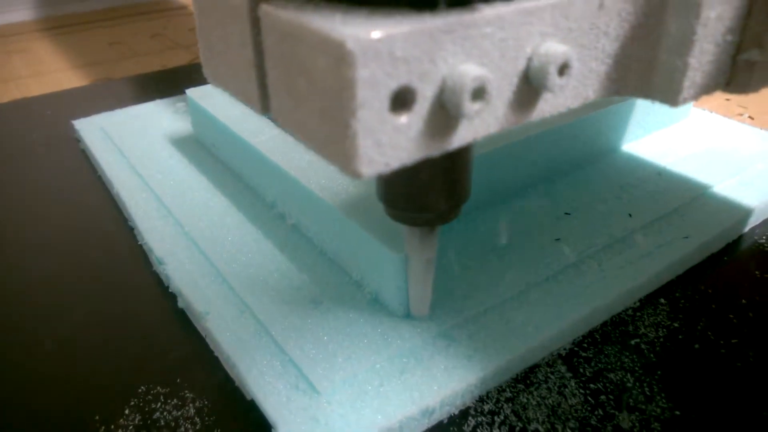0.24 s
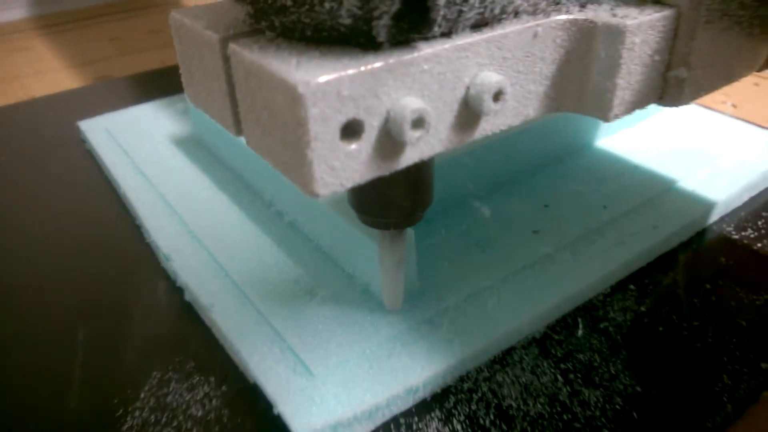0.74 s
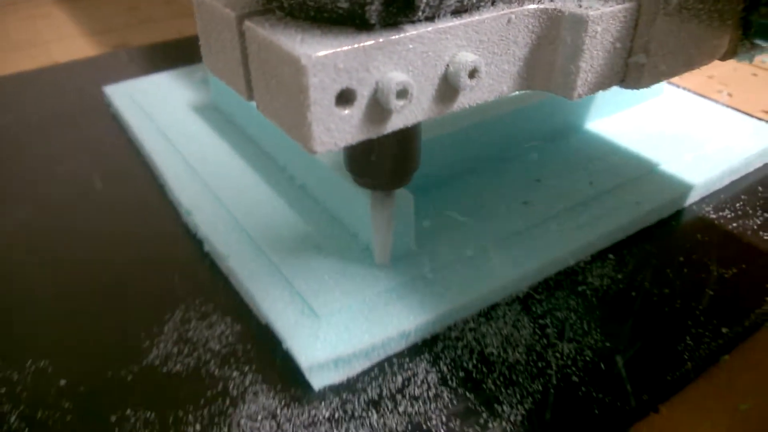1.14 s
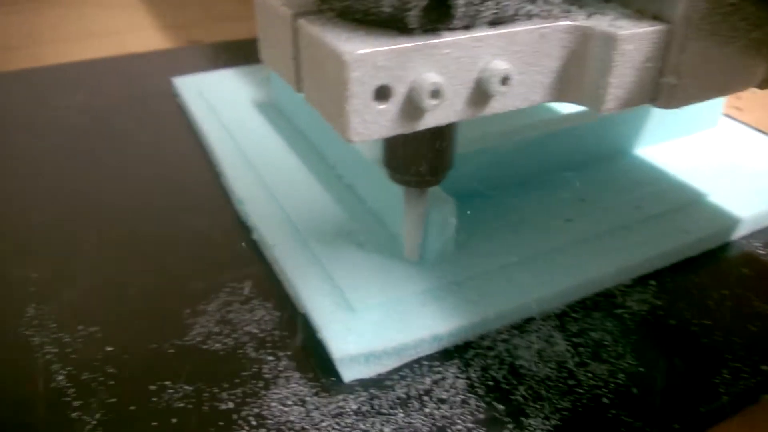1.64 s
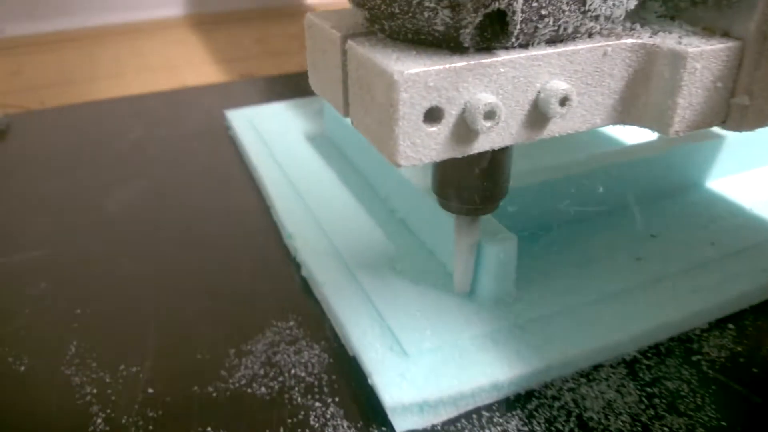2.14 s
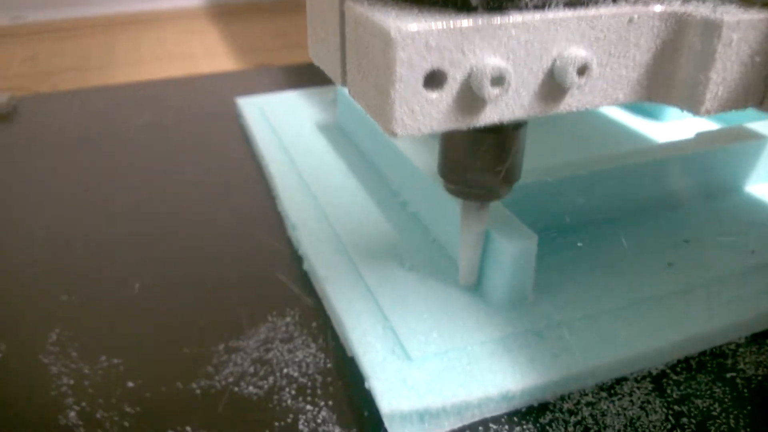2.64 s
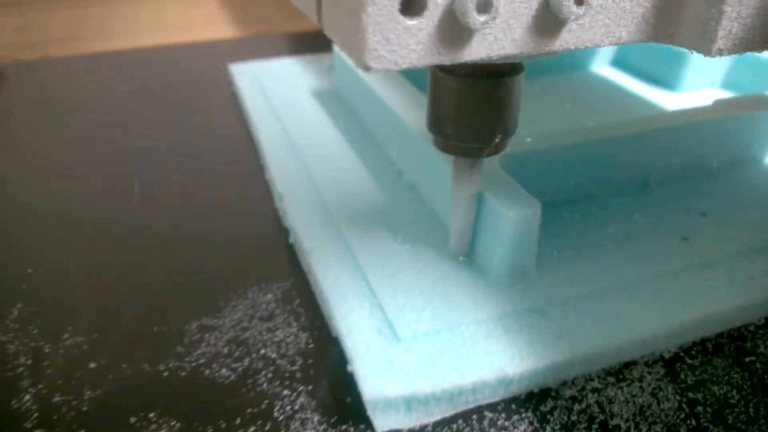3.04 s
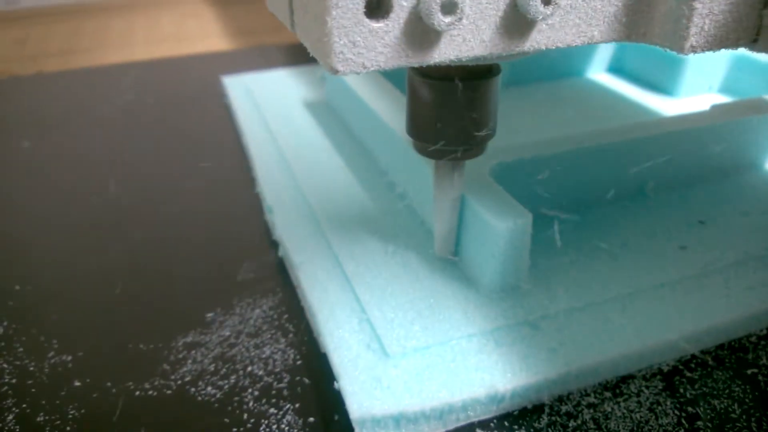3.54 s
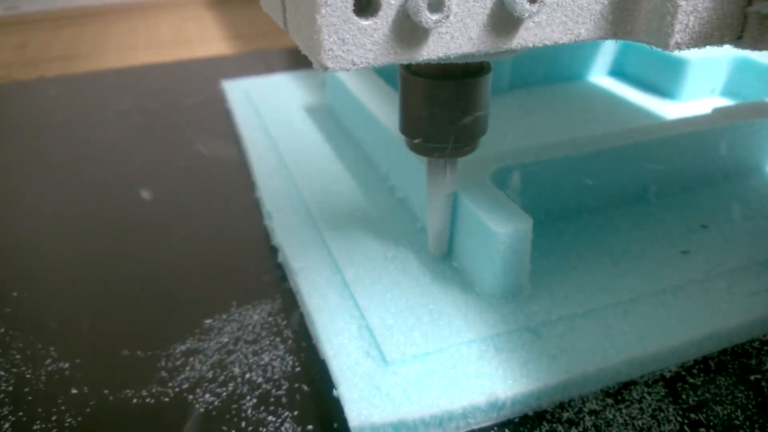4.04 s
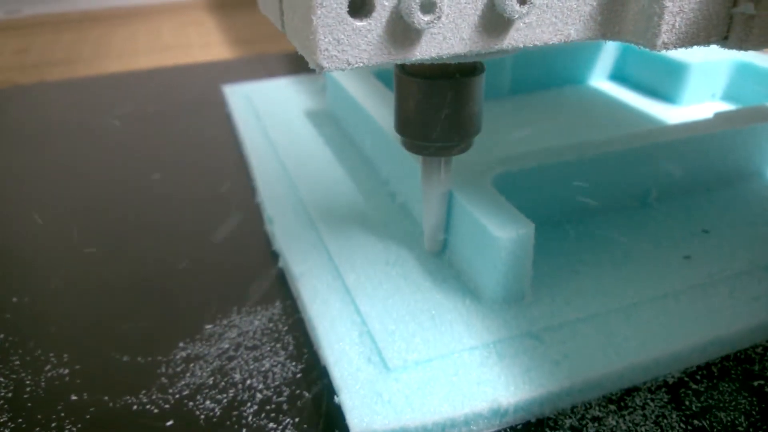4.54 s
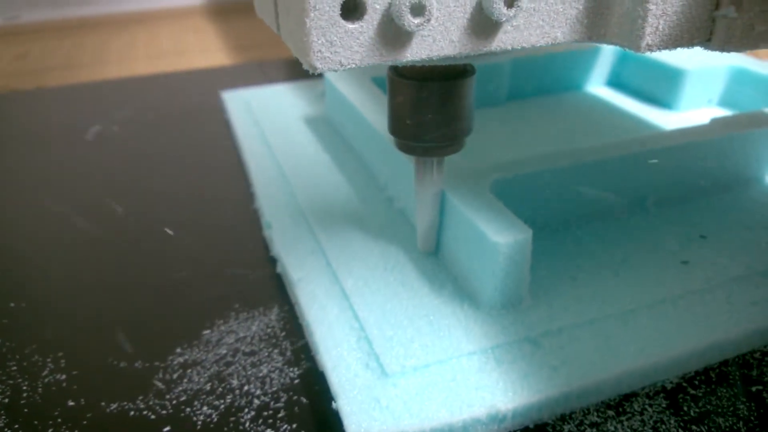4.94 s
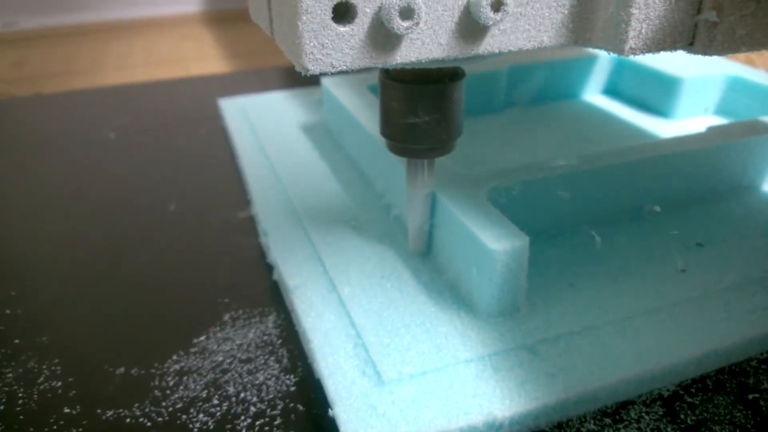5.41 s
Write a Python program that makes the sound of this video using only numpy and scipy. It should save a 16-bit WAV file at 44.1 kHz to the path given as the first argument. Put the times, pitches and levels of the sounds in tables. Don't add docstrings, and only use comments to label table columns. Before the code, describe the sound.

Close, piercing motor whine with chattering rasp and airy hiss; gusty rumble and crackles batter the left side before dying away.

```python
import sys
import numpy as np
from scipy import signal
from scipy.fft import rfft, irfft
from scipy.io import wavfile
from scipy.ndimage import uniform_filter1d

SR = 44100
rng = np.random.default_rng(int(sys.argv[2]) if len(sys.argv) > 2 else 0)


def master(y):
    cut = np.clip(np.atleast_2d(y).T, -1, 1)
    pcm = np.round(cut * 32767)
    wavfile.write(sys.argv[1], SR, pcm.astype(np.int16))


def gain_from_db(level_db):
    decades = np.asarray(level_db, float) / 20
    return 10 ** decades


N = 250047

RESTING_TURNS = 188.8
TURN_SAMPLES = 2 ** 16
SLOW_STEP = 16

# time in seconds, level in dB, lean left over right in dB.
VIEW = [(0.0, -33, -5), (0.25, -31.5, -5.5), (0.52, -36, -4), (0.6, -40.5, -4.5), (0.77, -41.5, -3.5),
        (1.12, -32, -5.5), (1.26, -32, -5), (1.44, -31, -11.5), (1.64, -32.5, -5.5), (2.02, -33.5, -9),
        (2.27, -37, -12.5), (2.35, -33.5, -12.5), (2.54, -34, -9), (2.8, -31.5, -16.5), (2.91, -35, -16),
        (3.06, -34, -18.5), (4.26, -34.5, -18), (5.67, -35, -13)]


def rms_one(x):
    return x / np.sqrt(np.mean(np.abs(x) ** 2) + 1e-20)


def seconds():
    return np.arange(N) / SR


def in_time(rows):
    s, *columns = np.transpose(rows)
    return [np.interp(seconds(), s, column) for column in columns]


def at_hz(points, hz):
    point_hz, point_db = np.transpose(points)
    return np.interp(np.log(hz), np.log(point_hz), point_db)


def bin_hz():
    return np.maximum(np.fft.rfftfreq(N, 1 / SR), 1)


def slowly(rate_hz):
    r = np.exp(-2 * np.pi * rate_hz * SLOW_STEP / SR)
    noise = rng.standard_normal(N // SLOW_STEP + 3002)
    return rms_one(signal.lfilter([1], [1, -2 * r, r * r], noise)[3000:])


def filled(slow):
    return np.interp(np.arange(N) / SLOW_STEP, np.arange(len(slow)), slow)


def drift(rate_hz):
    return filled(slowly(rate_hz))


def flutter(rate_hz, depth):
    z = slowly(rate_hz) + 1j * slowly(rate_hz)
    return filled(rms_one(z * (np.abs(z) + 1e-3) ** (depth - 1)))


def held(z, share):
    power = uniform_filter1d(np.abs(z) ** 2, size=466)
    return z * (power + 0.036) ** (-.5 * share)


def coloured(points, low_hz, high_hz):
    hz = bin_hz()
    edge = 1 / np.sqrt((1 + (low_hz / hz) ** 24) * (1 + (hz / high_hz) ** 24))
    return irfft(rfft(rng.standard_normal((2, N))) * gain_from_db(at_hz(points, hz)) * edge, N)


def sides(level_db, pan_db, lift_db):
    right = gain_from_db(level_db + lift_db) * 2 / np.sqrt(1 + gain_from_db(pan_db) ** 2)
    return np.array([right * gain_from_db(pan_db), right])


def bump(at_s, half_s):
    return np.exp(-((seconds() - at_s) / half_s) ** 2)


def bitten(idle, cutting):
    bite_s, takes_s = 0.96, 0.21
    share = .5 + .5 * np.tanh((seconds() - bite_s) / takes_s)
    return idle + share * (cutting - idle)


def throbs():
    # peak time in seconds, change in dB, half length in seconds.
    swells = [(0.108, 12, 0.03), (0.271, 10, 0.069), (0.356, -11, 0.024), (0.708, -4.6, 0.026),
              (0.914, 11, 0.02), (0.962, 15, 0.01), (1.072, 8, 0.02), (1.11, -12, 0.024), (1.149, 8, 0.02),
              (1.209, 8, 0.016), (1.228, -13, 0.012), (1.267, 3.5, 0.019), (1.319, -19, 0.01),
              (1.385, -9, 0.0091), (1.448, -7, 0.013), (1.468, 8.5, 0.014), (1.486, -9.5, 0.055),
              (1.539, 3.7, 0.016), (1.721, -15, 0.012), (1.789, 8.5, 0.018), (1.825, -9.5, 0.026),
              (1.887, 6.5, 0.044), (1.922, -16, 0.012), (2.046, 8, 0.026), (2.166, -11, 0.01),
              (2.27, -5.5, 0.047), (2.416, 8.2, 0.04), (2.494, -7, 0.02), (2.584, 3.5, 0.011),
              (2.681, -15, 0.017), (2.772, -8, 0.024), (2.84, 6, 0.043), (2.891, -9, 0.014),
              (2.934, -10, 0.01), (3.017, -21, 0.016), (3.049, 7.0, 0.027), (3.135, 7, 0.014),
              (3.167, 8.5, 0.013), (3.185, -18, 0.012), (3.3, 2, 0.022), (3.342, -6.1, 0.017),
              (3.393, -5.5, 0.013), (3.482, -17, 0.018), (3.515, 6.5, 0.028), (3.578, 8.5, 0.014),
              (3.712, -17, 0.021), (3.74, 5, 0.023), (3.81, -6, 0.026), (3.86, 2, 0.024),
              (3.915, -1, 0.045), (3.997, -8, 0.038), (4.107, -9, 0.029), (4.206, -6.8, 0.01),
              (4.275, -18, 0.017), (4.336, 6, 0.02), (4.366, -14, 0.02), (4.65, 4, 0.034),
              (4.743, -6.2, 0.026), (5.156, -9, 0.016), (5.567, 5, 0.02)]
    return sum(np.interp(seconds(), [s - half, s, s + half], [0, db, 0]) for s, db, half in swells)


def shaft_orders():
    # clean line in dB, rubbing just under it in dB, chatter under load in dB.
    order_levels = [(-80, -49.5, -44), (-41.5, -48, -46), (-48.5, -47, -61), (-40, -41, -44),
                    (-44, -34, -47.5), (-31.5, -32.5, -21), (-39, -50, -38), (-39, -41, -22.5),
                    (-41, -53, -24), (-45, -37.5, -25), (-43, -45, -29), (-34, -38.5, -27.5),
                    (-53, -61, -24), (-50, -36, -33), (-52, -50, -38), (-41, -31.5, -41), (-31, -38, -48),
                    (-42, -36, -32), (-45, -40, -45), (-57, -49, -56), (-53, -38.5, -54), (-54, -37, -36),
                    (-53, -72, -37), (-44, -45.5, -43), (-47, -46, -54), (-65, -39, -39), (-65, -51, -40),
                    (-65, -46, -36.5)]
    # order, clean in dB, rubbing in dB, chatter in dB.
    high_orders = [(41, -54, -43, -41.5), (51, -60, -47, -39.5), (53.7, -56, -52, -41.5),
                   (62.4, -68, -53, -63), (83.5, -58, -52, -68)]
    # clean in dB, rubbing in dB, chatter in dB.
    even_db = [4, -1, 5.5]
    low = np.c_[13 + np.arange(len(order_levels)), order_levels]
    top = np.arange(41, 84)
    at, *outline = np.transpose(high_orders)
    top_db = np.transpose([np.interp(top, at, db) for db in outline])
    parity = .5 * (-1.) ** top * (top < 63)
    table = np.vstack([low, np.c_[top, top_db + np.outer(parity, even_db)]])
    return table[:, 0].astype(int), table[:, 1:].T


def zone_gains(main_db, upper_db, chatter):
    upper_db = main_db + upper_db
    focus = np.clip(bitten(0.22, 0.53 + 0.61 * chatter), .02, .98)
    view_db, lean_db = in_time(VIEW)
    main_pan_db, body_pan_db = 11.2 + 1.24 * lean_db, 9.8 + 2 * lean_db
    upper_pan_db = 1 - 13 * bump(2.24, 0.27)
    broad_db = uniform_filter1d(main_db, size=5000)
    throb_db = chatter * (upper_db - uniform_filter1d(upper_db, size=15000))
    body_db = view_db + bitten(-4.5, 2.5) + 0.23 * throb_db
    top_db = view_db + 0.57 * throb_db
    return [sides(-42 + 0 * view_db, lean_db + 3, -1.5),
            np.sqrt(1 - focus) * sides(broad_db, main_pan_db, -0.49),
            np.sqrt(focus) * sides(main_db, main_pan_db, 0.0006),
            sides(upper_db + 0.34 * (broad_db - main_db), upper_pan_db, -2.3),
            sides(body_db, body_pan_db, -1.1),
            sides(top_db, lean_db, -6.5),
            sides(top_db, lean_db, -6.0),
            sides(view_db, lean_db + 5, -14.0),
            sides(view_db, lean_db + 8, -15.5)]


def one_turn(orders, level_db, phase):
    spectrum = np.zeros(TURN_SAMPLES, complex)
    spectrum[orders] = gain_from_db(level_db) * np.exp(1j * phase)
    return rms_one(np.fft.ifft(spectrum))


def spindle(turn, main_db, upper_db, chatter, offset_hz):
    zone_hz = [2400, 2900, 3280, 3500, 4300, 6000, 7700, 10300, 12500, 15800]
    loads = [0.2, 0.24, 1.27, 1.04, 0.92, 0.91, 1.7, 0.091, 0.091]
    orders, levels_db = shaft_orders()
    clean_db, rub_db, _ = levels_db
    phases = (0.93 + 0.68 * (orders > 60)) * rng.standard_normal((3, len(orders)))
    path = (-1.) ** orders * np.minimum(1.15 + .02 * (orders - 18), 1.7)
    gains = zone_gains(main_db, upper_db, chatter)
    rough = bitten(3.5, 0.93 - 0.27 * chatter) - .55
    at = (turn % 1 * TURN_SAMPLES).astype(int)
    slip = 2 * np.pi * np.cumsum(offset_hz) / SR
    shake = flutter(7.8, 0.61)
    lag = np.exp(-2j * np.pi * 15.0 * seconds())
    order_hz = orders * RESTING_TURNS - 30
    out = np.zeros((2, N))
    for k, (low, high) in enumerate(zip(zone_hz, zone_hz[1:])):
        use = (order_hz > low) & (order_hz <= high)
        load = np.clip(chatter * loads[k], 0, .97)
        clean = 1 / (1 + np.sum(gain_from_db(rub_db[use]) ** 2) / np.sum(gain_from_db(clean_db[use]) ** 2))
        skirt = flutter(25.0, 1.0)
        rub = rms_one(flutter(10.8, 0.99) + 0.62 * skirt * lag) * lag
        rub = (rub + rough * skirt * lag ** 2) / np.sqrt(1 + rough ** 2)
        clean = clean / (1 + 0.57 * rough ** 2)
        overtone = 2 if k > 4 else 1
        swing = rms_one(shake ** overtone + 0.3 * skirt * lag) * np.exp(-1j * overtone * slip)
        carriers = [np.sqrt((1 - load) * clean),
                    np.sqrt((1 - load) * (1 - clean)) * rub,
                    np.sqrt(load) * swing]
        hold = 0.36 * (k > 5)
        if k in (2, 3):
            hold = np.clip(0.54 * chatter + 0.068, 0, .9)
        for side in range(2):
            if side:
                apart = .27 * (1 + (k > 6))
                carriers[1:] = [c + apart * (np.roll(c, shift=2600) - c) for c in carriers[1:]]
            shift = (1 - side) * path[use]
            waves = [one_turn(orders[use], db[use], p[use] + shift)[at] for db, p in zip(levels_db, phases)]
            whine = sum(w * c for w, c in zip(waves, carriers))
            out[side] += gains[k][side] * np.sqrt(2) * held(whine, hold).real
    return out


def hiss(turn, hiss_db):
    # frequency in Hz, density in dB.
    hiss_spectrum = [(2300, 0), (2800, -58), (3300, -0.5), (3900, -8), (4500, -6), (5400, -8), (6200, -4.5),
                     (7100, -11), (9300, -4.5), (11500, -18), (15500, -33)]
    edges_hz = [6000, 7000, 8000, 9000, 10500, 17000]
    noise = coloured(hiss_spectrum, 2430, 5640)
    for low, high in zip(edges_hz, edges_hz[1:]):
        noise = noise + coloured(hiss_spectrum, low, high) * gain_from_db(0.73 * drift(3.8))
    puffs = 1 + 0.76 * np.cos(2 * np.pi * turn)
    noise = noise * puffs * gain_from_db(0.8 * drift(22))
    lean_db = in_time(VIEW)[-1]
    return sides(hiss_db, lean_db + 4, -0.22) * rms_one(noise)


def bearings(turn, tones_db, high_db):
    # frequency in Hz, rms
    # level in dB.
    shaft_locked_tones = [(166.9, -62), (376.8, -57), (489.9, -59), (565.2, -59), (678.3, -49), (753.7, -54),
                          (866.7, -63), (1130, -63), (1168, -60), (1281, -55), (1357, -60), (1545, -60), (1733, -63),
                          (1890, -60), (1922, -63), (2035, -52), (2078, -61), (2223, -60), (2331, -62), (2412, -52),
                          (2498, -62), (2519, -57),
                          (5346, -50), (5421, -41)]
    out = np.zeros((2, N))
    for hz, level_db in shaft_locked_tones:
        start = rng.uniform(0, 2 * np.pi) + np.array([[hz / 900], [0]])
        if abs(hz - 678) < 5:
            level_db = level_db + 1.5
        lean_db = -5.5 if hz < 3000 else -17
        swell_db = 1.34 * drift(1.3) if hz < 3000 else 2.44 * drift(16)
        gain_db = level_db + 9.5 + tones_db + (hz > 1800) * high_db + swell_db
        gain = gain_from_db(gain_db) * gain_from_db([[lean_db], [0]])
        out += gain * np.sin(2 * np.pi * turn * hz / RESTING_TURNS + start)
    return out


def rasps(level_db):
    # low edge in Hz, high edge in Hz, idle level in dB, cutting level in dB, left over right in dB.
    resonances = [
        (3070, 3400, -36.5, -54.5, 1),
        (5150, 5400, -60, -47.5, -17),
    ]
    out = 0
    for low_hz, high_hz, idle_db, cut_db, pan_db in resonances:
        a, b = rms_one(coloured([(20, 0), (20000, 0)], low_hz, high_hz))
        rasp_db = bitten(idle_db, cut_db) + level_db + 33.5 + 2.4 * drift(19)
        out = out + sides(rasp_db, pan_db, 0) * np.array([a, 1.06 * a + 0.36 * b])
    return out


def air(tones_db):
    # frequency in Hz, density in dB per Hz.
    air_spectrum = [(35, -7), (60, -21.5), (275, -10.5), (676, 1), (893, -3.5), (1300, -6.5), (1440, -6),
                    (1990, -7.5), (3000, -6.5), (3900, -27), (6600, -120)]
    # frequency in Hz, left over right in dB.
    air_lean = [(60, 13.5), (150, 7), (380, -0.5), (950, -4), (2380, -1), (5980, 24), (15000, -7.0)]
    bass = coloured(air_spectrum, 39.4, 474)
    bass[0] = 0.79 * bass[1] + .5 * bass[0]
    noise = rms_one(bass + coloured(air_spectrum, 490, 3100))
    noise[0] = irfft(rfft(noise[0]) * gain_from_db(at_hz(air_lean, bin_hz())), N)
    return gain_from_db(-37.5 + 1.21 * tones_db) * noise


def bands_shifted(x):
    # peak time in seconds, centre in Hz, change in dB, half length in seconds.
    band_changes = [(1.9, 9500, 3, 0.46), (4.3, 9700, -2, 0.6), (5.6, 9600, 1, 0.26), (3.95, 8900, 14, 0.47),
                    (4.67, 8800, -5, 0.53), (1.6, 8760, -3.5, 0.42), (2, 7500, 6, 0.23),
                    (2.43, 7900, 4, 0.12), (2.4, 11900, -6.5, 0.55), (2.52, 10900, 6, 0.17),
                    (5.4, 10740, 10.5, 0.24), (4.76, 10700, 4, .3), (2.63, 6250, -10, 0.26),
                    (3.3, 6660, 5.5, 0.96), (4.66, 5990, 7.5, 0.53), (5.5, 7150, -11, 0.62),
                    (1.7, 13000, -3, .4), (3.3, 12900, -10, 0.33), (4.4, 13000, 4, .5),
                    (0.14, 11700, 6, 0.23), (2.5, 4800, -3.5, 1), (6.4, 5420, -2, 0.49), (1.9, 670, 4, 0.68),
                    (3.85, 678, -12.5, 0.76), (5.3, 678, 1.5, 0.27), (1.6, 1140, 11, .6), (3.8, 2600, 4, .5),
                    (2.42, 1545, 0, 0.26), (2.1, 2080, -5, 0.4), (5.3, 2035, 3, 1)]
    # peak time in seconds, centre in Hz, change in dB,
    # half length in seconds.
    line_changes = [(0.41, 4535, 5.5, .5), (0.33, 4130, -10, 0.7), (0.27, 5500, -5, .5), (0.3, 3900, 1, 0.46),
                    (0.44, 3000, -15, 0.59), (0.26, 3390, -5.5, .4), (.3, 3300, 9, .5), (0.36, 3470, -8, .5),
                    (4.8, 4150, 6.5, 0.93), (2.8, 4900, 9.5, 0.58), (2.47, 4110, 5, 0.46),
                    (2.5, 3015, 7, 0.48), (2.6, 5060, -12, 0.35), (1.8, 4510, -3, 0.28), (4, 3900, 1, 0.88),
                    (4.6, 5480, -2, 1)]
    hz, s, frames = signal.stft(x, SR, nperseg=1024)
    gain_db = np.zeros((len(hz), len(s)))
    for changes, width in ((band_changes, 0.038), (line_changes, 0.02)):
        for at_s, centre_hz, db, half_s in changes:
            across = np.exp(-((hz / centre_hz - 1) / width) ** 2)
            gain_db += db * np.outer(across, np.exp(-((s - at_s) / half_s) ** 2))
    patches = uniform_filter1d(rng.standard_normal(gain_db.shape), size=4, axis=0)
    patches = rms_one(uniform_filter1d(patches, size=9, axis=1))
    gain_db = gain_db + 2 * patches * (hz > 3450)[:, None]
    return signal.istft(frames * gain_from_db(gain_db), SR, nperseg=1024)[1][:, :N]


def draught():
    # time in seconds, strength in dB.
    gust = [(0.0, -18.5), (0.7, -19), (0.95, -21.5), (1.28, -24), (1.49, -38), (1.55, -27.5), (1.64, -28),
            (1.78, -27.5), (1.98, -30.5), (2.16, -35.5), (2.39, -41.5), (2.47, -28.5), (2.66, -32),
            (2.81, -46.5), (3.66, -48.5), (3.77, -55.5), (4.5, -58), (5.67, -78)]
    gust_db, = in_time(gust)
    rumble_db = gust_db + 0.5 * drift(5.8)
    rush_db = -20.5 + 1.28 * (gust_db + 20) + 0.95 * drift(11.0)
    jet_db = 12.5 * bump(0.98, 0.22)
    flap_db, spit_db = -5.5 + 0.13 * jet_db, -17 + jet_db
    aimed_db = np.interp(seconds(), [1.19, 1.27], [0, -14])
    lumps = drift(35)
    rumble = coloured([(20, -16.5), (50, -2.5), (130, -7.0)], 21, 148.0) * gain_from_db(2.0 * lumps)
    rush = coloured([(130, 0), (250, -3), (450, -6)], 130, 470) * gain_from_db(1.3 * lumps + .9 * drift(40))
    flap = coloured([(450, 0), (700, -3), (1200, -9)], 470, 1200) * gain_from_db(1.5 * lumps + 1.8 * drift(90))
    ticks = signal.lfilter([1], [1, -.97], (rng.random(N) < 70 / SR) * rng.exponential(1, N))
    bursts = gain_from_db(1.0 * lumps + 5.5 * drift(230)) + 3.1 * ticks
    spit = coloured([(1100, 7.5), (2000, -5.0), (3000, -13.5), (6000, 1)], 1230, 4000) * bursts
    wind = gain_from_db(np.maximum(rumble_db, -68) + 3.5) * rms_one(rumble)
    wind = wind + gain_from_db(rush_db + 5.0) * rms_one(rush)
    wind = wind + gain_from_db(rush_db + flap_db + 7.0 + 0.58 * aimed_db) * rms_one(flap)
    wind = wind + gain_from_db(rush_db + spit_db + 7.5 + aimed_db) * rms_one(spit)
    return wind * gain_from_db([[0], [-39]])


def snaps():
    # start in seconds, peak in dB.
    snap_times = [(0.037, -12), (0.09, -20), (0.15, -21), (0.154, -10), (0.173, -8), (0.217, -11),
                  (0.301, -16), (0.319, -13), (0.343, -14), (0.406, -21), (0.503, -6), (0.544, -15),
                  (0.57, -18), (0.589, -14), (0.617, -23), (0.635, -15), (0.652, -22), (0.678, -19),
                  (0.696, -18), (0.723, -21), (0.741, -10), (0.784, -17), (0.805, -7), (0.823, -12),
                  (0.832, -2), (0.851, -19), (0.874, -9), (0.884, -7), (0.912, -16), (0.931, -12),
                  (0.977, -9), (0.998, -21), (1.042, -14), (1.069, -13), (1.16, -16), (1.183, -25),
                  (1.229, -9), (1.279, -29), (1.318, -26), (1.343, -13)]
    at_s, peak_db = np.transpose(snap_times)
    clicks = np.full(N, 1e-18)
    sign = np.where(rng.random(len(at_s)) < .7, -1, 1)
    clicks[(at_s * SR).astype(int) + 20] = gain_from_db(peak_db + 21.5) * sign
    dull = signal.butter(1, [350, 1800], "band", fs=SR, output="sos")
    return signal.sosfilt(dull, clicks) * [[1], [.02]]


def scene():
    # time in seconds, speed in turns per second.
    speed = [(0.0, 188.93), (0.4, 189.08), (0.9, 189.53), (1.2, 189.62), (1.5, 189.55), (1.8, 189.13),
             (2.2, 188.5), (2.5, 188.33), (3.0, 188.56), (3.9, 188.75), (4.7, 188.91), (5.7, 188.86)]
    # time in seconds, ring in dB, upper ring above it in dB, chatter share 0-1,
    # chatter offset below the orders in Hz.
    cutter_load = [(0, -29.5, -13, 0.77, 20), (.5, -32.5, -8, 0.5, 40), (.7, -32, -1.5, 0.1, 70),
                   (.95, -31.5, 2, 0.3, 55), (1.2, -22, 1, 0.54, 42), (1.7, -21, 0, 0.97, 35),
                   (2.2, -25, -1.5, 0.72, 24), (2.6, -24, -4, 0.73, 34), (3.0, -23.5, -10.5, 0.63, 33),
                   (3.5, -28, -13.5, 0.33, 25), (4.0, -28.5, -14, 0.14, 22), (4.6, -34, -15.5, 0.06, 20),
                   (5.67, -41, -5.5, 0.18, 20)]
    turn = np.cumsum(in_time(speed)[0] + 0.0505 * drift(2.96)) / SR
    ring_db, upper_db, chatter, offset_hz = in_time(cutter_load)
    ring_db = ring_db + uniform_filter1d(throbs(), size=350)
    level_db, _ = in_time(VIEW)
    tones_db = -2.5 + 2.1 * np.minimum(level_db + 36, 0)
    machine = spindle(turn, ring_db, upper_db, np.clip(chatter, 0, 1), offset_hz)
    machine = machine + hiss(turn, level_db - 5 + 3 * chatter)
    machine = machine + bearings(turn, tones_db, 4.5 - 8.5 * chatter)
    machine = machine + rasps(level_db) + air(tones_db)
    return bands_shifted(machine) + draught() + snaps()


def top_cut(x):
    return signal.sosfilt(signal.butter(12, 16860, fs=SR, output="sos"), x)


def record(dry):
    rounded = 1.3 * np.tanh(dry / 1.3)
    low_pass = signal.ellip(14, .5, 70, 15830, fs=SR, output="sos")
    return top_cut(signal.sosfilt(low_pass, rounded))


dry = scene()
out = record(dry)
master(out)
```